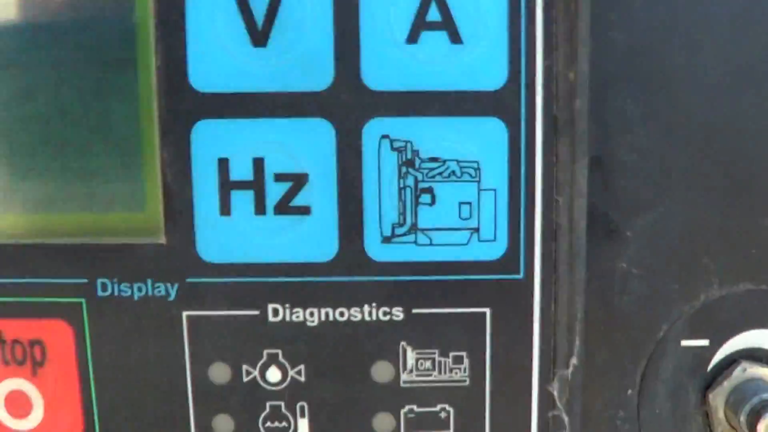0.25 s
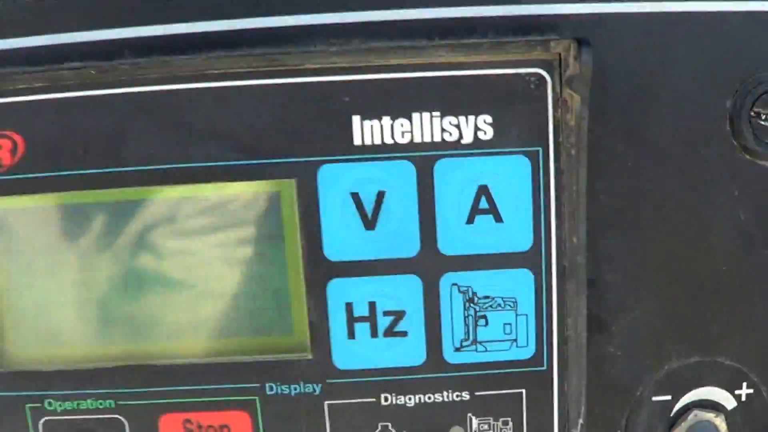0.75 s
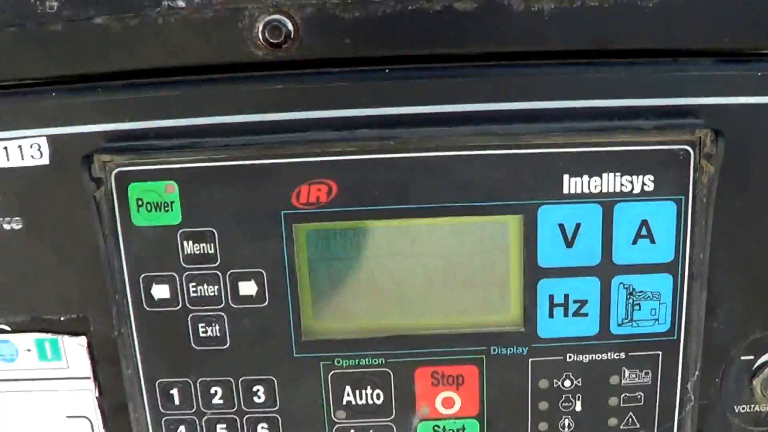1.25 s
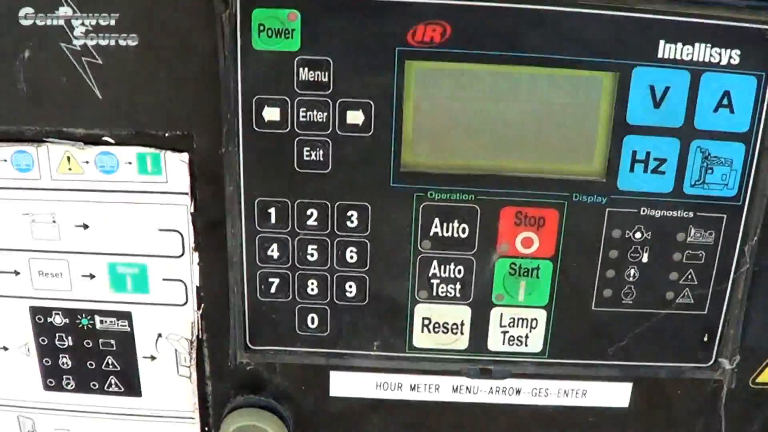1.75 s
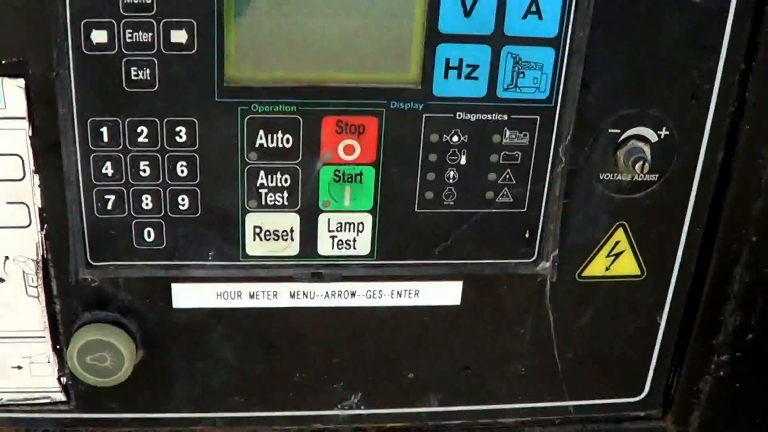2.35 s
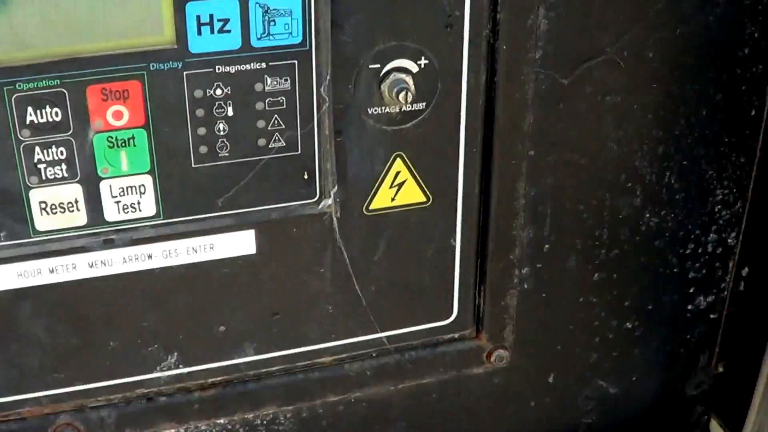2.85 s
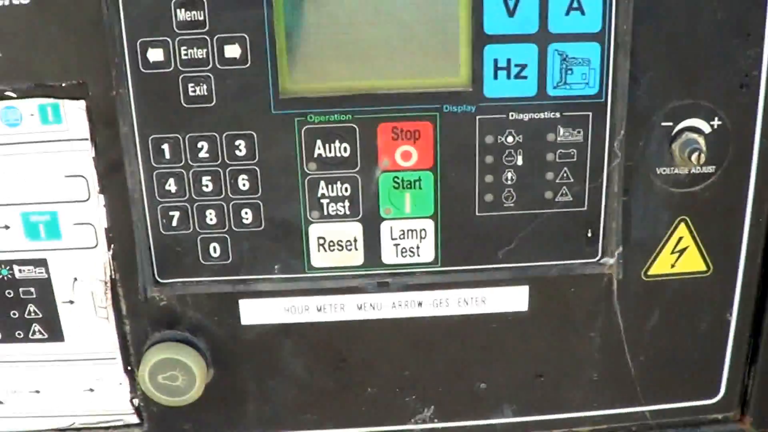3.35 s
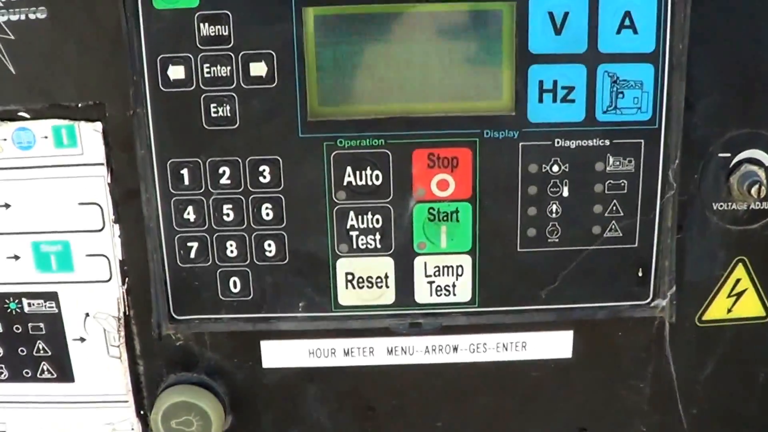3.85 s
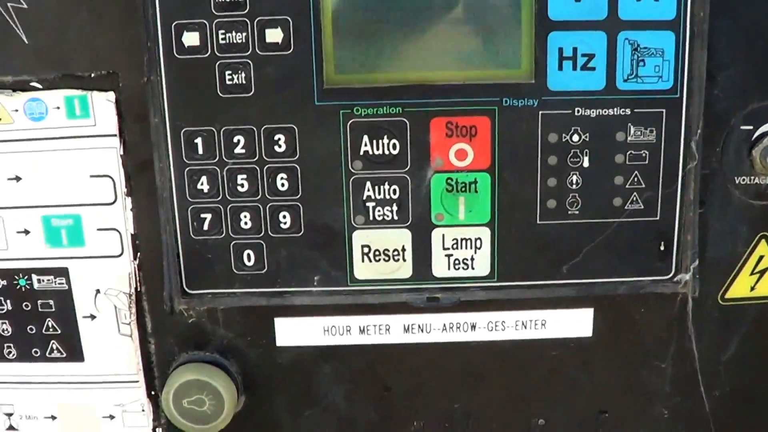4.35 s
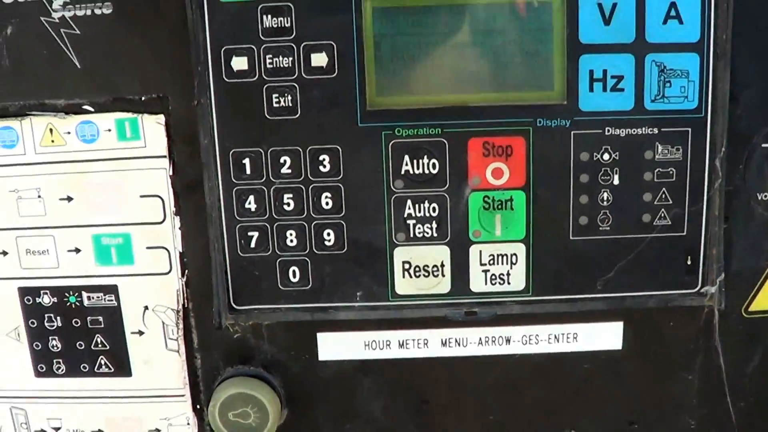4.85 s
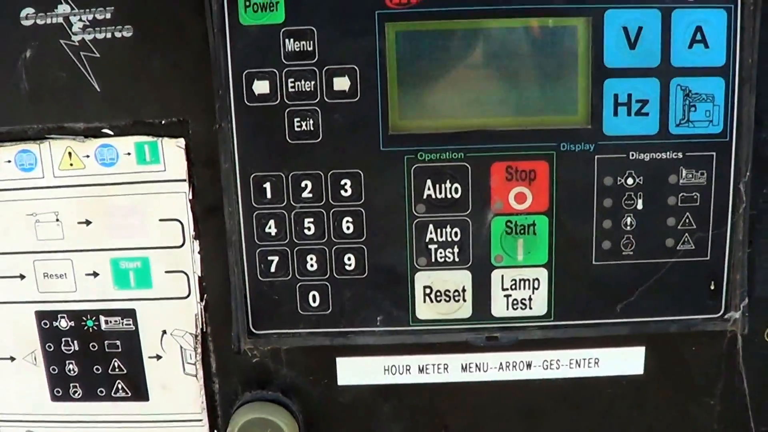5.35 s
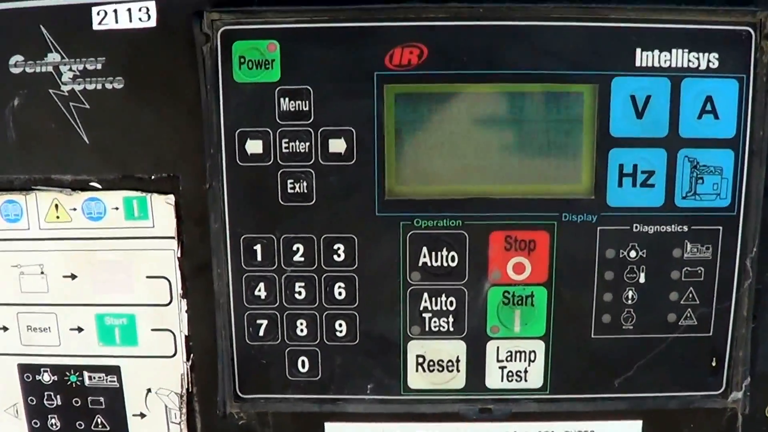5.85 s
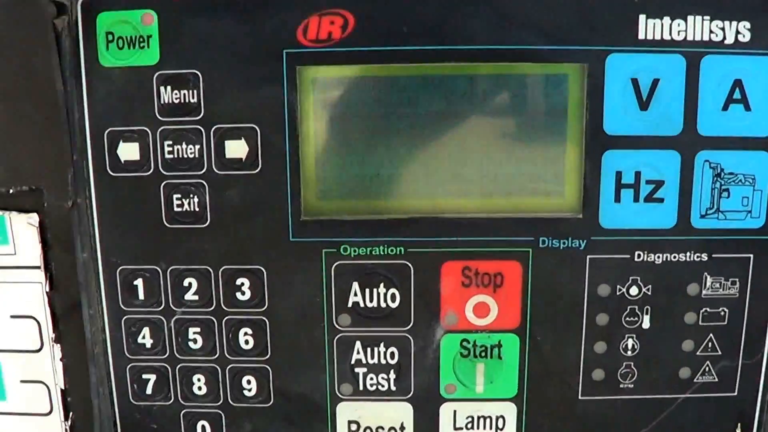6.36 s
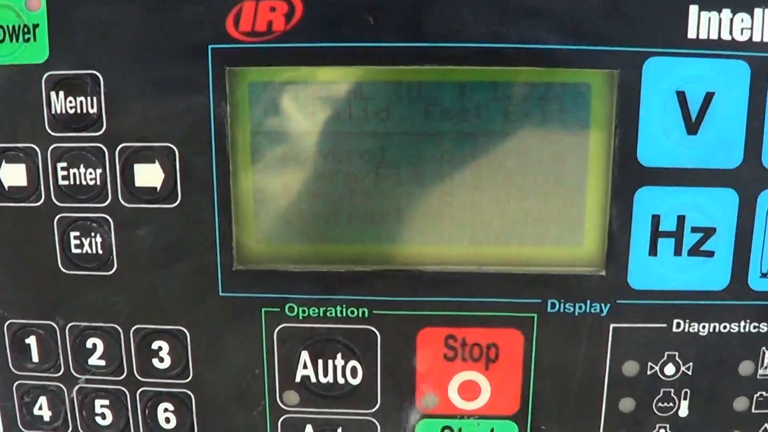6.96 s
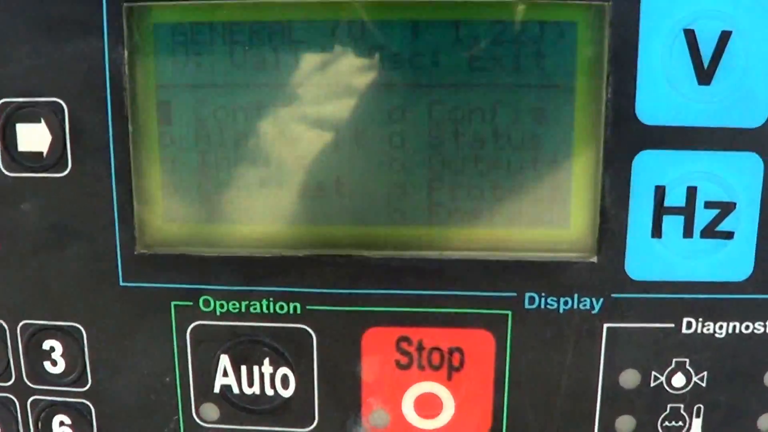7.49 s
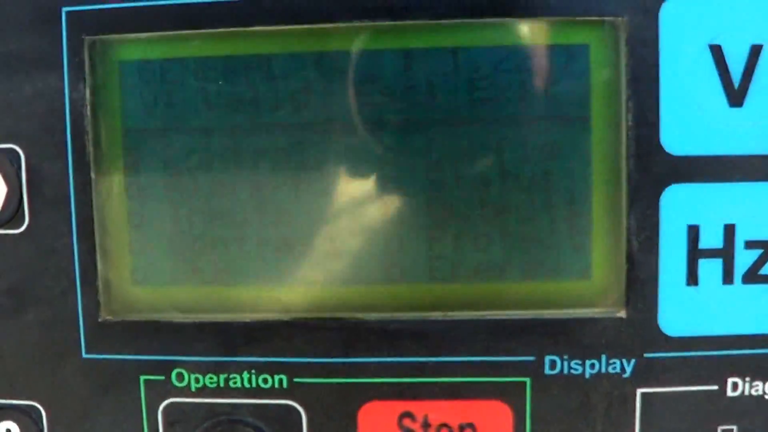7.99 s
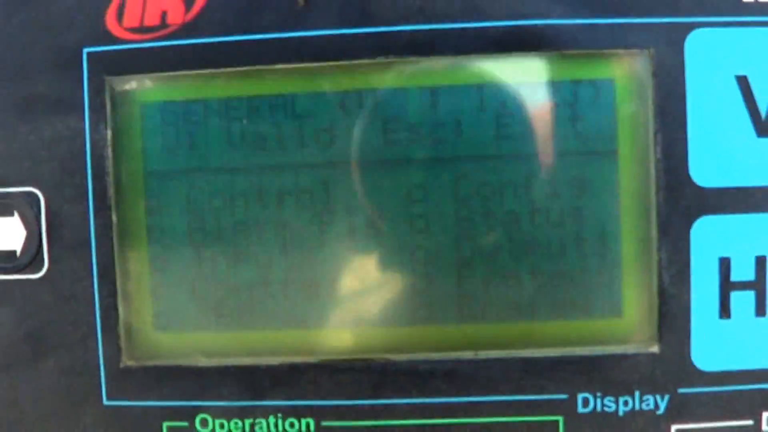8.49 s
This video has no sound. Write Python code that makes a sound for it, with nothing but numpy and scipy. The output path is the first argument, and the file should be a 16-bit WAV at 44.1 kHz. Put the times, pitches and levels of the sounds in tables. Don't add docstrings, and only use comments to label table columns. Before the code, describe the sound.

A four-cylinder diesel generator in a metal canopy runs without pause at fixed speed. A thick, buzzing engine drone carries fan tones, thin gear whine, rushing cooling air and fast, bright valve rattle. Outdoors, a hand-held stereo microphone stays near the control panel, moving slightly so the tones and brightness shift. No start, stop or button presses.

```python
import sys
import numpy as np
from scipy import signal
from scipy.fft import rfft, irfft, next_fast_len
from scipy.io import wavfile
from scipy.ndimage import uniform_filter1d

SR = 44100
rng = np.random.default_rng(int(sys.argv[2]) if len(sys.argv) > 2 else 0)


def gain_from_db(level_db):
    decades = np.asarray(level_db, float) / 20
    return 10 ** decades


def materialize(psi):
    bounded = np.clip(np.atleast_2d(psi).T, -1, 1)
    quanta = np.round(bounded * 32767).astype(np.int16)
    wavfile.write(sys.argv[1], SR, quanta)


N = 384904

# (time [s], engine cycle rate [Hz])
SPEED = [
    (0, 15.381),
    (2.5, 15.387),
    (6.5, 15.39),
    (8.73, 15.399),
]
CYCLE_HZ = SPEED[1][1]
SIDES = np.array([[1.], [-1.]])


def on_hz(table, hz):
    f, v = np.transpose(table)
    return np.interp(np.log(np.maximum(hz, 1)), np.log(f), v)


def on_time(table):
    s, *columns = np.transpose(table)
    return [np.interp(np.arange(N) / SR, s, c) for c in columns]


def shape(x, gain):
    size = next_fast_len(N)
    hz = np.arange(size // 2 + 1) * SR / size
    return irfft(rfft(x, size) * gain(hz), size)[..., :N]


def walk(rate):
    k = int(SR / rate)
    held = np.repeat(rng.standard_normal(N // k + 1), k)
    smooth = uniform_filter1d(uniform_filter1d(held, k), k)[:N]
    return smooth / smooth.std()


def stereo_noise():
    # (frequency [Hz], power share unlike left and right [0-1])
    apart = [(30, 0.22), (70, 0.13), (170, .02), (300, 0.21), (700, 0.23), (2500, 0.099), (4500, 0.085),
             (8000, 0.16), (12000, 0.013), (16000, 0.0092)]
    size = next_fast_len(N)
    mid, side = rfft(rng.standard_normal((2, size)))
    share = on_hz(apart, np.linspace(0, SR / 2, len(mid)))
    return irfft(mid * np.sqrt(1 - share) + SIDES * side * np.sqrt(share), size)[:, :N]


def air(gust_db=-0.3, flicker_db=0.72):
    # (frequency [Hz], level [dB per Hz])
    rumble_db = [(20, -88), (60, -89), (100, -56.5), (160, -56), (215, -45), (260, -51.5), (295, -53),
                 (350, -59), (470, -48.5), (550, -56), (650, -52), (1030, -62), (1110, -59.5), (1700, -69)]
    # (frequency [Hz], level [dB per Hz])
    hiss_db = [(1200, -69), (1700, -60.5), (2300, -59), (2900, -57), (3400, -63), (4400, -67),
               (6000, -60.5), (7000, -64), (8800, -62.5), (10500, -68), (13000, -71), (14200, -74),
               (15700, -78), (20000, -90)]
    per_hz = np.sqrt(SR / 2)
    rumble = shape(stereo_noise(), lambda hz: per_hz * gain_from_db(on_hz(rumble_db, hz)) / (1 + (hz / 2200) ** 6))
    hiss = shape(stereo_noise(), lambda hz: per_hz * gain_from_db(on_hz(hiss_db, hz)))
    return rumble * gain_from_db(gust_db * walk(2.88)) + hiss * gain_from_db(flicker_db * walk(9))


def valves(turns, high, scatter_db=1.0, jitter=0.0021, rattle_t60_s=0.047):
    # (place in the cycle [0-1], level [dB], centre [Hz], width [Hz], rise at height 1 [dB])
    seatings = [(.16, -22.5, 8100, 3900, 2), (.67, -21, 8530, 4000, 0.5), (.78, -29, 7600, 5800, -2),
                (0.85, -30.5, 12000, 3900, 2), (.86, -30, 6000, 2500, 1), (.2, -29.5, 4200, 880, -0.5),
                (.17, -37, 8000, 280, 5), (.68, -33, 8130, 280, 9), (.67, -40.5, 9900, 600, 9),
                (0.7, -38, 13300, 500, 3), (0.1, -34, 13000, 3700, -2), (.51, -34, 13800, 3500, 0)]
    cycles = np.arange(1, int(turns[-1]) + 1)
    size = next_fast_len(N)
    f = np.arange(size // 2 + 1) * SR / size
    decay = np.exp(-np.log(1000) / (rattle_t60_s * SR))
    rattle, out = stereo_noise(), 0
    for place, db, hz, width, high_db in seatings:
        chance = rng.standard_normal((len(cycles), 2)).T
        at = np.minimum(np.searchsorted(turns, cycles + place + jitter * chance[0]), N - 1)
        kicks = np.bincount(at, gain_from_db(db + high_db * high[at] + scatter_db * chance[1]), N)
        ring = signal.lfilter([1], [1, -decay], kicks)
        band = np.exp(-((f - hz) / width) ** 2 * 2) * np.sqrt(SR / 2 / width)
        out = out + rfft(ring * rattle, size) * band
    return irfft(out, size)[:, :N]


def tone(turns, db, turbulence):
    shake = 1 + turbulence * (walk(18) + 1j * walk(18))
    return gain_from_db(db) * np.sqrt(2) * np.imag(shake * np.exp(2j * np.pi * (turns + rng.random())))


def fan(turns, along_m, near, high):
    # (multiple of the blade rate, level [dB rms], turbulence [0-1])
    steady = [
        (1, -33, 0.36),
    ]
    # (direct level [dB rms], turbulence [0-1], reflected share [0-1], loudest place [m])
    standing = [
        (-33.5, 0, 0.34, 0.26),
        (-36, 0.27, 0.5, 0.19),
        (-28, 0.15, 0.8, 0.062),
        (-32.5, 0.31, 0.18, 0.089),
        (-42, 1, 0.86, 0.086),
    ]
    # (level [dB rms], rise at nearness 1 [dB], rise at height 1 [dB])
    whines = [(-41.5, -2, 6), (-39.5, -1.5, -1.5), (-33.5, -4, 1.5), (-50, 7, 10), (-41, -1, -1)]
    whine_multiples = [70, 84, 184, 187, 192]
    blades_per_cycle = 40 / 3
    standing_multiples = [24] + [k * blades_per_cycle for k in (2, 3, 4, 5)]
    sound_m_s = 343

    out = sum(tone(round(k) * blades_per_cycle * turns, db, rough) for k, db, rough in steady)
    for k, (db, rough, share, loudest_m) in zip(standing_multiples, standing):
        wavelength_m = sound_m_s / (k * CYCLE_HZ)
        both = np.abs(1 + share * np.exp(4j * np.pi * (along_m - loudest_m) / wavelength_m))
        out = out + both * tone(k * turns, db, rough)
    for k, (db, near_db, high_db) in zip(whine_multiples, whines):
        out = out + tone(k * turns, db + near_db * near + high_db * high, 0.062)
    return out


def one_cycle(gains):
    # (place in the cycle [0-1], from [Hz], to [Hz], phase slip [radians])
    knocks = [
        (.39, 880, 1650, 1.25),
        (.92, 2550, 4000, 1.5),
    ]
    size = 1 << 14
    hz = np.arange(1, len(gains) + 1) * CYCLE_HZ
    step = 2 * np.pi * rng.random(len(gains))
    slip = rng.standard_normal(len(gains))
    for place, lo, hi, spread in knocks:
        step = np.where((hz > lo) & (hz < hi), spread * slip - 2 * np.pi * place, step)
    return gains * np.exp(1j * np.cumsum(step)) * size / np.sqrt(2), size


def spin(lines, size, turns):
    wave = irfft(np.r_[0, lines], size)
    return np.interp(turns % 1 * size, np.arange(size + 1), np.r_[wave, wave[0]])


def engine(turns, scatter_db=3.0, sway=0.78, apart_db=-10.5, order_sway_db=-10.5):
    # (multiple of the cycle rate, level [dB rms])
    orders = [(4, -48.5), (7, -37), (8, -43), (10, -36.5), (11, -24), (13, -31.5), (16, -48), (20, -39),
              (25, -40.5), (26, -35.5), (36, -39), (42, -33.5), (43, -39), (45, -44.5), (48, -38),
              (49, -37.5), (51, -40), (60, -38), (64, -35), (66, -36.5), (67, -35.5), (69, -42.5),
              (78, -38), (87, -43.5), (93, -36.5), (96, -39.5), (144, -41.5)]
    # (frequency [Hz], level of each [dB rms])
    clatter_db = [(15, -73), (50, -75), (77, -53), (200, -47.5), (500, -43), (750, -38), (900, -44.5),
                  (1050, -39), (1120, -45.5), (1700, -48), (2600, -47.5), (2900, -47.5), (3300, -53.5),
                  (9000, -67.5)]
    k = np.arange(1, 600)
    clatter = gain_from_db(on_hz(clatter_db, k * CYCLE_HZ) + scatter_db * rng.standard_normal(len(k)))
    strong = np.zeros(len(k))
    for order, db in orders:
        strong[round(order) - 1] = gain_from_db(db)
        clatter[round(order) - 1] = 0
    clatter[[23, 39]] = 0

    lines, size = one_cycle(clatter + strong)
    angle = sway * walk(0.9)
    mid = spin(lines * (strong > 0), size, turns)
    mid += spin(lines * (strong == 0), size, turns) * np.cos(angle)
    mid += spin(*one_cycle(clatter), turns) * np.sin(angle)
    mid += gain_from_db(order_sway_db) * walk(1.286) * spin(*one_cycle(strong * (k > 20)), turns)
    side = spin(*one_cycle(clatter + strong * (k > 15)), turns)
    return mid + SIDES * gain_from_db(apart_db) * side


def scene():
    # (time [s], walked along the canopy [m], nearness to the panel [-1..1],
    #  height along the panel [-1..1], turn to the left [dB])
    drift = [(0, 0.001, 0.93, -0.24, -.5), (.7, 0.0018, 0.32, 0.54, 0), (1.2, 0.032, -.2, -0.56, 0),
             (1.9, 0.068, -0.066, -0.41, .2), (2.8, 0.079, -0.18, -1.1, 2.5), (3.6, 0.06, -0.28, -0.51, 0),
             (4.5, 0.12, -.2, -0.3, 0), (5.5, 0.13, -0.51, -0.094, 0), (6.3, 0.12, 0.03, -0.0064, 0),
             (7, 0.16, -0.05, 0.22, 0), (7.7, 0.18, 0.71, 0.45, 0), (8.73, 0.16, 0.61, 0.027, -.4)]
    # (frequency [Hz], colour at nearness 1 [dB])
    near_colour = [(200, -0.5), (300, 0), (450, 1), (800, 1.7), (1500, 0.5), (2400, 3), (2850, 0.5),
                   (3200, 4), (4200, -.4), (5900, -2.5), (7000, -0.5), (12500, 0), (13500, 0), (15000, 2.5)]
    # (frequency [Hz], colour at height 1 [dB])
    high_colour = [(220, 1), (340, 1), (420, 3), (580, 0.5), (900, -1.1), (1400, 0.5), (5000, 1.5),
                   (7400, 1), (8050, 3.5), (8700, 1), (13000, 1.5), (13500, 4), (14200, 0.5)]
    # (frequency [Hz], phase by which left leads [radians])
    lead = [(50, 0.97), (170, .8), (430, 0.78), (780, 0.42), (1030, 0.76), (1460, 0), (2760, 0.17),
            (6600, 0.44), (8300, 0.22), (16000, 0)]
    # (frequency [Hz], left minus right [dB])
    balance_db = [(60, 1), (170, 0.5), (320, 1), (420, -2), (580, 0.5), (700, -3.5), (1000, -0.7),
                  (1800, -1.4), (2400, -0.5), (5800, 0.5), (7600, -0.5), (11000, 0)]

    turns = -.007 + 1 + np.cumsum(on_time(SPEED)[0]) / SR
    along_m, near, high, turn_db = on_time(drift)
    machine = engine(turns) + air() + valves(turns, high)
    heard = machine
    for place, colour in ((near, near_colour), (high, high_colour)):
        heard = heard + place * shape(machine, lambda hz: on_hz(colour, hz) * np.log(10) / 20)
    screen_near_db, screen_high_db = -0.5, -0.68
    heard = heard * gain_from_db(screen_near_db * near + screen_high_db * high) + fan(turns, along_m, near, high)
    middle = shape(heard, lambda hz: hz / (hz + 250) / (1 + (hz / 8000) ** 4))
    heard = heard + (gain_from_db(SIDES * turn_db / 2) - 1) * middle
    return shape(heard, lambda hz: np.exp(.5j * SIDES * on_hz(lead, hz)) * gain_from_db(SIDES * on_hz(balance_db, hz) / 2))


def top_cut(x):
    return signal.sosfilt(signal.butter(12, 15820, fs=SR, output="sos"), x)


def record(dry):
    rounded = np.tanh(0.79 * dry) / 0.82
    cut = shape(rounded, lambda hz: hz < 15750)
    return top_cut(cut)


dry = scene()
out = record(dry)
materialize(out)
```